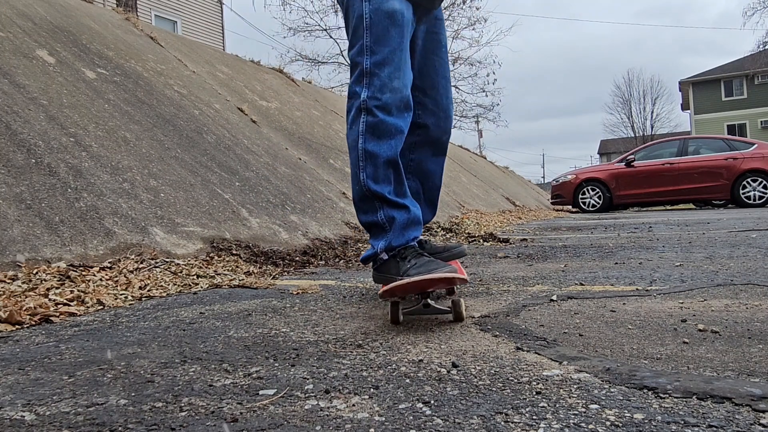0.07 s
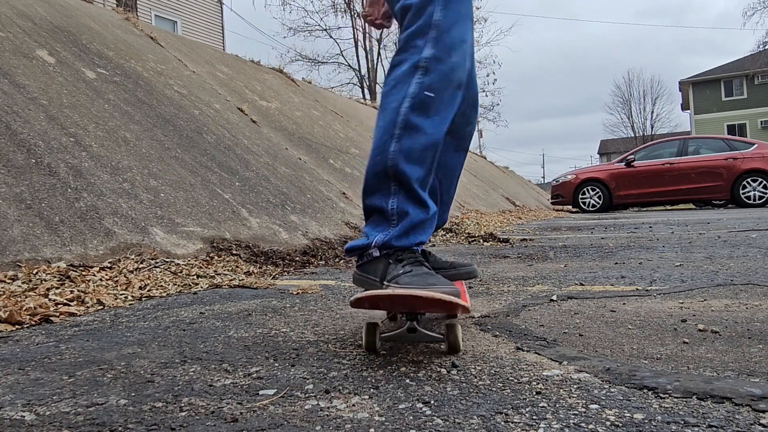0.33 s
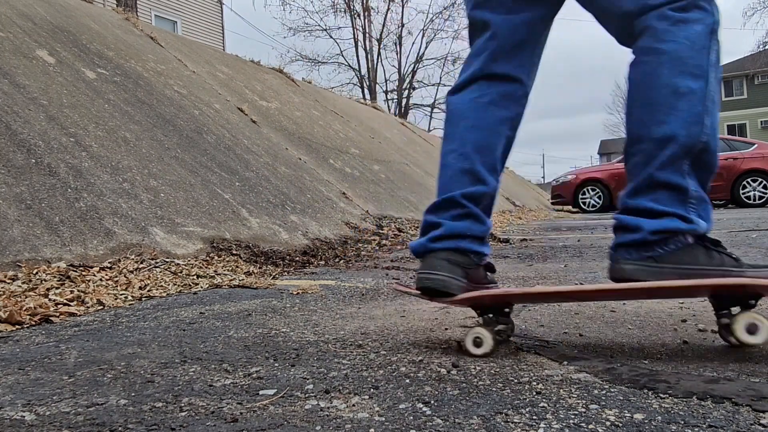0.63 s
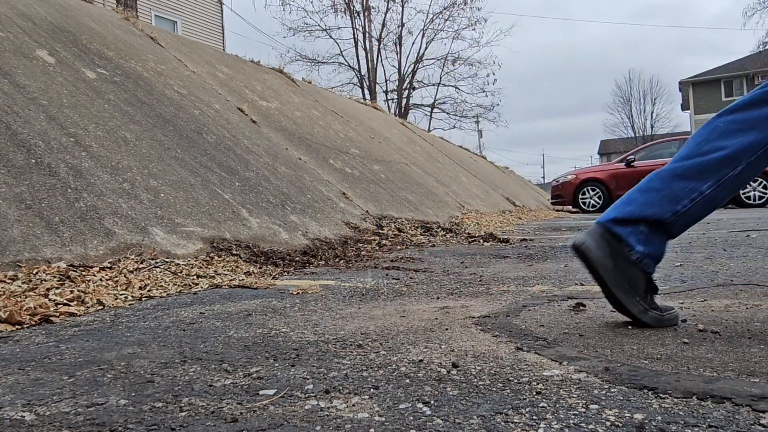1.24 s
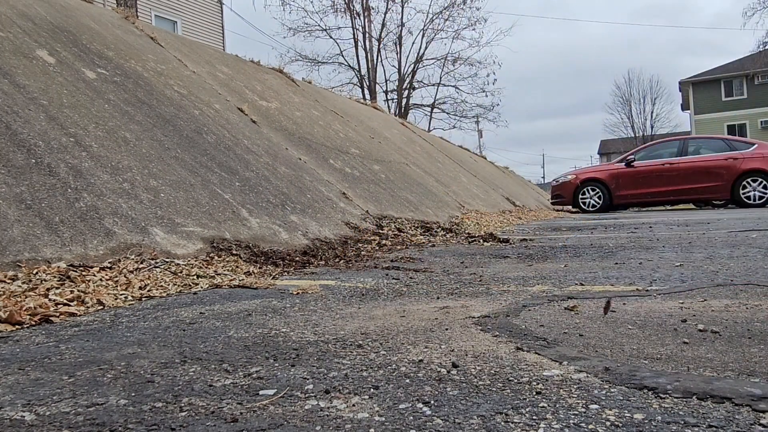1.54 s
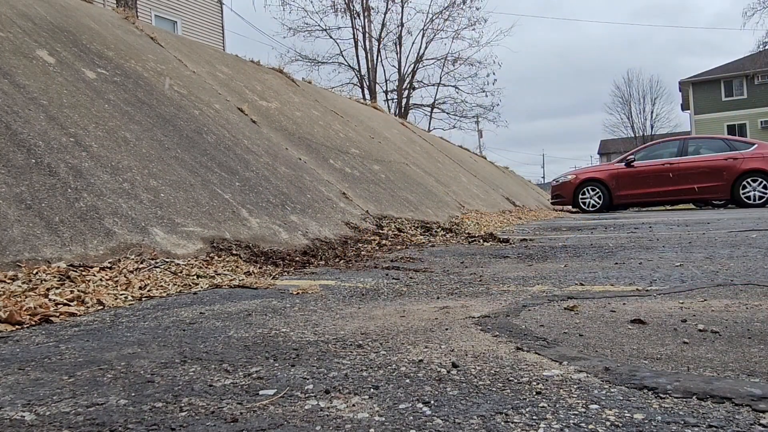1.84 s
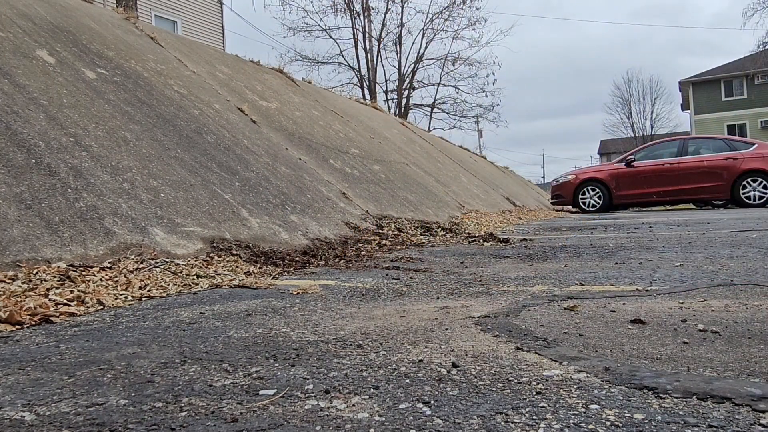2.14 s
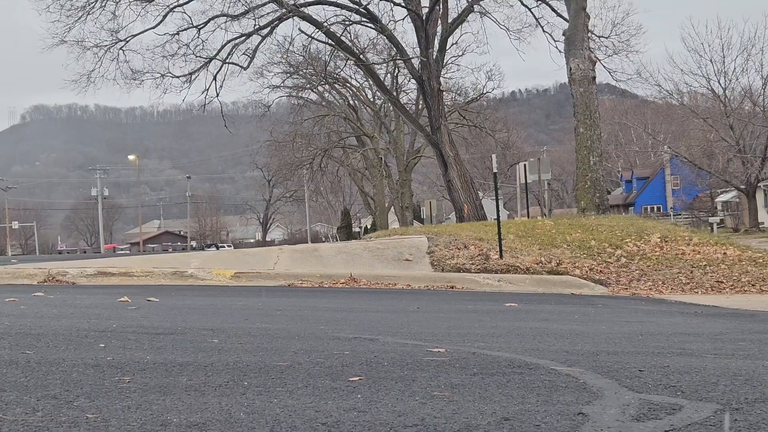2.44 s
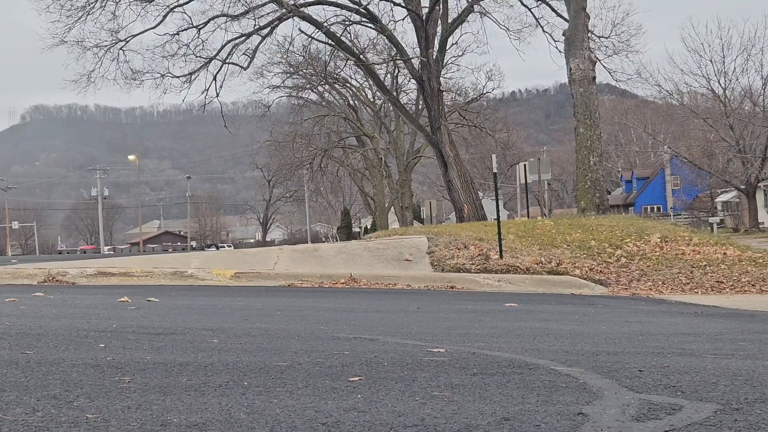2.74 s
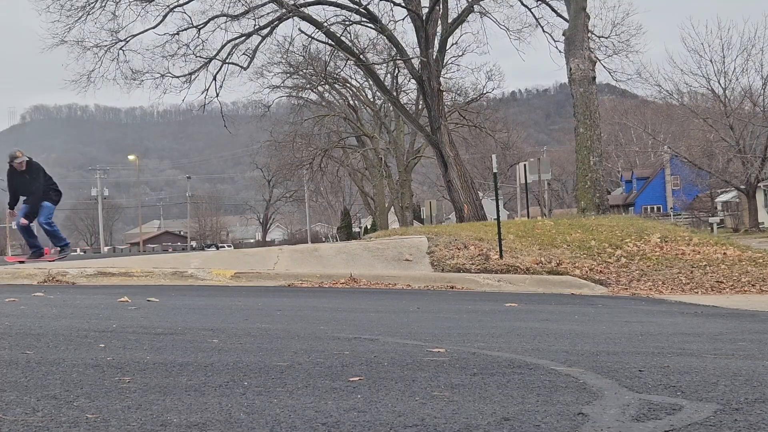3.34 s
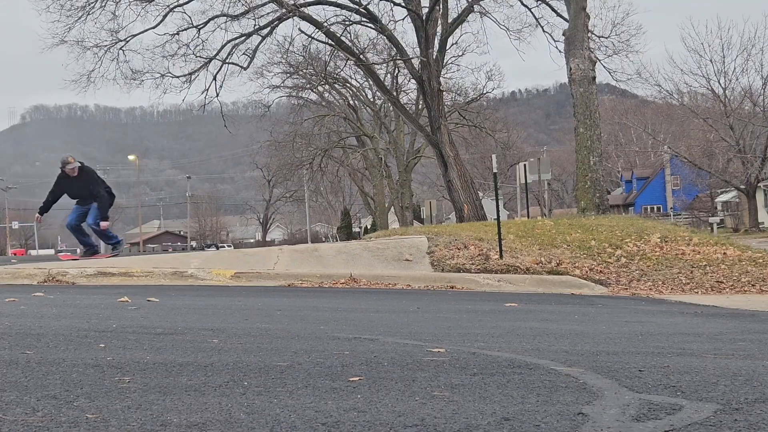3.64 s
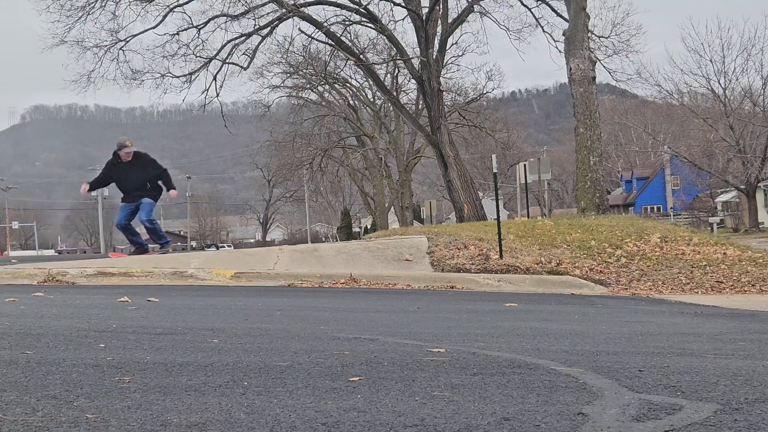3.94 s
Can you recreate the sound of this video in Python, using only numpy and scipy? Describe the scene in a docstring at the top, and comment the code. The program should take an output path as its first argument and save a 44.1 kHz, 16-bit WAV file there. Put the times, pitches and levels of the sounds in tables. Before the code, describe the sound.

A skateboard rattles past close on rough asphalt, then rumbles faintly in the distance.

```python
"""On rough asphalt, a skateboard rolls past close by: stones shake the deck, rattle the wheels and crunch.
It pivots and slaps its front wheels down, the trucks (the steel axles) scrape, the tail clacks and a
shoe scuffs. Free of the rider's weight, it rolls off to the right with a hollow drone.
After an abrupt break, a board rolls far away on a smoother street, a low rumble with a faint hiss.
Rolling and scraping are noise shaped by the board; knocks are sets of fading tones."""
import sys
import numpy as np
from scipy import signal
from scipy.fft import rfft, irfft, next_fast_len
from scipy.io import wavfile
from scipy.ndimage import map_coordinates

SR = 44100
rng = np.random.default_rng(int(sys.argv[2]) if len(sys.argv) > 2 else 0)


def log_audio(samples):
    """Write samples as a 16-bit WAV file to the path given in sys.argv[1]."""
    # one column per channel
    frames = np.atleast_2d(samples).T
    # limit to full scale, then quantise
    limited = np.clip(frames, -1, 1)
    pcm = np.round(limited * 32767).astype(np.int16)
    wavfile.write(sys.argv[1], SR, pcm)


N = 176400
T = np.arange(N) / SR
FFT_SIZE = next_fast_len(N + SR // 2)
HZ = np.fft.rfftfreq(FFT_SIZE, 1 / SR)

# How loud the close rolling is. Each row: time in seconds, then thrum, chatter and grit in dB.
ROLL_LEVELS = [(0.01, -34, -40, -45), (0.2, -37, -40.5, -51.5), (0.26, -22.5, -36, -49),
               (0.36, -18.5, -34, -40.5), (0.45, -27.5, -27, -38), (0.49, -30.5, -36.5, -43.5),
               (0.555, -23.5, -27.5, -37), (0.59, -30, -34, -42), (0.64, -30, -26, -32.5),
               (0.695, -34, -41, -47), (0.738, -29, -28, -34.5), (0.79, -44, -50.5, -57),
               (0.865, -36.5, -36.5, -41.5), (0.955, -32, -41.5, -45.5), (1.01, -77, -39.5, -44.5),
               (1.11, -49, -40.5, -44.5), (1.2, -42, -36, -48), (1.275, -26.5, -30.5, -35.5),
               (1.34, -37, -36, -44.5), (1.44, -39, -32.5, -42.5), (1.6, -34.5, -31.5, -43),
               (1.71, -33, -26, -43), (1.82, -32.5, -26, -43.5), (1.9, -26, -21, -41.5),
               (2.0, -20.5, -21.5, -43.5), (2.07, -27, -26, -44), (2.2, -30, -25, -48)]
# The rider's weight comes off the deck. Each row: time in seconds, share taken off from 0 to 1.
WEIGHT_OFF = [(1.05, 0), (1.4, .5), (1.62, 1)]
# The board's path. Each row: time in seconds, delay of the left side in ms, left over right in dB.
BOARD_PATH = [(0, 0.031, 2.5), (.4, -0.062, 3.5), (.62, 0.13, 1.3), (.9, 0.23, 2), (1.4, 0.373, -1.1),
              (1.9, 0.45, 0.2)]

# The tone colour of each noise. Each row: frequency in Hz, relative strength in dB.
THRUM_TONE = [(20, -24), (40, -17), (60, -5.5), (100, -2), (145, 1), (200, -8.5), (260, -9.5), (450, -37.5),
              (900, -102)]
CHATTER_TONE = [(100, -52), (200, -5.5), (300, 2), (410, 0), (720, -2.5), (1000, -0.5), (1600, -2),
                (2000, -10.5), (2600, -23), (4000, -19.5), (9000, -65.5)]
DRONE_TONE = [(90, -20), (140, 1.5), (200, 0), (350, 0), (510, 3), (680, -4), (1100, -20.5), (1450, -11.5),
              (1900, -22), (2500, -32.5), (3300, -35), (8000, -74.5)]
GRIT_TONE = [(800, -41), (2000, -0.5), (4000, -2.5), (8400, 0), (9700, -10.5), (11200, -11), (13000, -3),
             (15200, -2), (16000, -20)]
GRIT_AWAY_TONE = [(1500, -12.5), (2600, 5), (3400, -2.5), (4500, 3.5), (5700, -3), (7300, 1.5),
                  (8800, -6.5), (11000, -12.5), (15000, -5.5)]
AIR_TONE = [(20, -12.5), (50, 5.5), (300, -17.5), (1000, -57.5)]
SCRAPE_TONE = [(1500, -23.5), (3000, 0), (6000, -3.5), (10000, -26)]
FAR_RUMBLE_TONE = [(25, -20.5), (50, -1), (105, 0.5), (180, -5.5), (245, -5), (320, -12), (470, -7.5),
                   (600, -12.5), (800, -19.5), (960, -32.5), (1300, -35), (8000, -77)]
FAR_HISS_TONE = [(500, -16.5), (1200, 5), (2200, -2.5), (3500, -1), (6000, -4.5), (8500, -6.5),
                 (10500, -33), (13500, -16.5), (16000, -31)]
FAR_CLACK_TONE = [(150, -26), (520, 10), (1250, -9.5), (2200, -28), (9000, -63)]
# How alike left and right sound. Each row: frequency in Hz, likeness (1 means the same).
NEAR_LIKENESS = [(60, 0.67), (400, 0.92), (1500, 0.73), (4500, 0.13), (12000, 0.27)]
FAR_LIKENESS = [(100, 1), (400, 0.96), (1500, 0.28), (5000, 0.45), (12000, .35)]
# Where the deck (with and without weight) and the steel trucks ring.
# Each row: frequency in Hz, width in Hz, height over the noise in dB.
LOADED_PEAKS = [(521, 18, 2), (714, 45, 3.5), (1316, 39, -12.5)]
UNLOADED_PEAKS = [(217, 26, -0.5), (345, 40, 2.5), (2076, 87, 7.5)]
TRUCK_PEAKS = [(3540, 160, 19), (4280, 140, 6), (5400, 260, 14.5)]
# The tones of the struck board and tail. Each row: pitch in Hz, level in dB, seconds to fade by 60 dB.
BOARD_MODES = [(162.6, -14, 0.11), (308, -11, 0.054), (552, -0.5, 0.026), (635, -9.5, 0.033),
               (920, -9, 0.023), (1334, -12.5, 0.027), (1583, -6.5, 0.038), (1692, -10.5, 0.024),
               (2192, -17, 0.056), (3630, -19.5, 0.025), (5160, -19.5, 0.025)]
TAIL_MODES = [(283.6, -1.5, 0.081), (706, -1, 0.077), (1117, -1, 0.043), (1440, -8, 0.091), (1950, -9, .06)]

# Wheels hit stones or land. Each row: start in seconds, level in dB, offset for its crack in dB.
WHEEL_KNOCKS = [(0.031, -38.5, 9), (.107, -33, -3), (0.176, -22.5, -11), (.252, -23, -6.5),
                (.299, -21.5, -14), (.388, -16.5, -12), (0.4418, -20.5, -22.5), (0.5432, -22.5, -9),
                (.622, -20.5, -9.5), (0.7134, -13.5, -6.5), (0.7430, -4.5, -12.5), (.984, -26.5, -7.5),
                (1.034, -23, 0), (1.131, -30, -7), (1.776, -18, -30), (1.933, -11.5, -4),
                (1.981, -20.5, -19), (2.2015, -21, -17)]
# Pebbles snap under the wheels. Each row: start in seconds, level in dB, pitch in Hz.
PEBBLE_SNAPS = [(0.059, -28.5, 4530), (.185, -32, 6240), (0.336, -28, 4220), (0.44, -27, 5450),
                (0.5435, -28.5, 2136), (.69, -28.5, 7600), (.848, -25, 5380), (0.9853, -23.5, 6370),
                (1.128, -28.5, 7740), (1.367, -20, 8260), (1.373, -23, 7700), (1.477, -25, 8200),
                (1.491, -23, 3370), (1.7754, -29.5, 2150), (1.874, -31, 4560), (1.922, -25, 4470),
                (1.934, -22.5, 2090), (2.0726, -26.5, 4530)]
# The trucks scrape as the board swings round. Each row: time in seconds, level in dB.
SCRAPE_LEVELS = [(.785, -88), (.805, -45.5), (.87, -46.5), (.915, -39.5), (1.0, -68.5)]
# The tail skips on the asphalt. Each row: start in seconds, level in dB.
TAIL_HITS = [(.896, -31), (.903, -22.5), (.910, -23.5), (.919, -21)]
# Tail and shoe scuff the ground. Each row: middle and half length in seconds, deck and grit in dB.
SCUFF_SWELLS = [(0.911, 0.014, -31, -27.5), (1.164, 0.011, -30.5, -32.5), (1.305, 0.0084, -35, -35.5),
                (1.385, 0.017, -34.5, -37), (1.5, 0.0036, -30.5, -31)]
# The riderless board hums. Each row: middle and half length in seconds, pitch in Hz, level in dB.
HUM_SWELLS = [(1.409, 0.063, 483, -33.5), (1.71, .028, 480, -26.5), (1.755, 0.056, 135, -28.5),
              (1.98, 0.017, 140, -23), (2.07, 0.076, 334, -26.5), (2.155, 0.042, 206.1, -27)]
# How loud the distant rumble and hiss are. Each row: time in seconds, level in dB.
FAR_RUMBLE_LEVELS = [(2.6, -31), (2.78, -28), (3.0, -29.5), (3.28, -31.5), (3.44, -27.5), (3.58, -30.5),
                     (3.71, -28), (4, -28.5)]
FAR_HISS_LEVELS = [(2.42, -55), (2.58, -58.5), (2.72, -51.5), (2.89, -59), (3.3, -54), (3.42, -66.5),
                   (4, -66.5)]
# Distant wheels tick over seams and clack on the pavement. Each row: start in seconds, level in dB.
FAR_SEAM_TICKS = [(2.517, -48), (2.718, -41.5), (2.999, -49.5)]
FAR_WHEEL_CLACKS = [(3.404, -37.5), (3.519, -36), (3.745, -30.5), (3.907, -45)]


def amp(db):
    """Turn decibels into a gain."""
    return 10 ** (np.asarray(db) / 20)


def unit(x):
    """Scale to an average power of 1."""
    return x / np.sqrt(np.mean(x ** 2) + 1e-20)


def along(points):
    """Join (Hz, value) points into a curve over all frequencies."""
    hz, values = np.transpose(points)
    return np.interp(np.log(HZ + 1), np.log(hz + 1), values)


def curves(rows):
    """Give one value per sample for each column after the time."""
    times, *columns = np.transpose(rows)
    return [np.interp(T, times, column) for column in columns]


def wobble(rate):
    """A smooth curve through rate random values a second."""
    return map_coordinates(rng.standard_normal(4096), [T * rate], mode="wrap")


def decay(start, t60):
    """Start suddenly, then fade by 60 dB every t60 seconds."""
    return (T >= start) * np.exp(-np.log(1000) * np.abs(T - start) / t60)


def swell(middle, half):
    """Rise and fall in a bell shape."""
    return np.exp(-.5 * ((T - middle) / half) ** 2)


def body(tone, peaks=()):
    """A filter for how an object colours sound: its broad tone plus ringing peaks."""
    ringing = sum(amp(db) / (1 + (2 * (HZ - hz) / width) ** 2) for hz, width, db in peaks)
    gain = unit(amp(along(tone)) * (1 + ringing))
    cepstrum = irfft(np.log(np.maximum(gain, 1e-6)), FFT_SIZE)
    # Folding it in half makes the object ring after a push, never before.
    cepstrum[1:FFT_SIZE // 2] *= 2
    cepstrum[FFT_SIZE // 2 + 1:] = 0
    return np.exp(rfft(cepstrum))


def stones(rate, spread_db, life_s, bed):
    """The push of rough ground: rate random bumps a second over a steady share, the bed."""
    hits = (rng.random(N) < rate / SR) * amp(spread_db * np.minimum(rng.exponential(size=N), np.pi))
    power = signal.lfilter([1], [1, -np.exp(-1 / (life_s * SR))], hits ** 2)
    return np.sqrt(bed + (1 - bed) * power / power.mean())


def rub(force, response, likeness=NEAR_LIKENESS):
    """Rough contact: stereo noise follows the force and sounds through a body."""
    angle = np.arccos(along(likeness)) / 2
    noise = rfft(force * rng.standard_normal((2, N)), FFT_SIZE)
    mid, side = irfft(noise * response * [np.cos(angle), np.sin(angle)], FFT_SIZE)[:, :N]
    return np.array([mid + side, mid - side])


def struck(modes, blows):
    """Each blow rings an object's own tones, a little differently every time."""
    out, t = np.zeros(N + SR), np.arange(SR // 3) / SR
    attack = 1 - np.exp(-t / .001)
    for start, db in blows:
        ring = 0
        for hz, level, t60 in modes:
            gain = amp(level + 1.5 * rng.standard_normal())
            pitch = hz * (1 + .014 * rng.standard_normal())
            ring += gain * np.exp(-np.log(1000) * t / t60) * np.sin(2 * np.pi * pitch * t)
        out[round(start * SR):][:len(t)] += amp(db) * ring * attack
    return out[:N]


def panned(x, db):
    """Make the left side louder than the right by db."""
    return x * np.array([amp(db / 2), amp(-db / 2)]).reshape(2, -1)


def lagged(x, ms):
    """Make the left side later than the right by ms."""
    half = ms * SR / 2000
    return np.array([map_coordinates(channel, [np.arange(N) + shift], order=5)
                     for channel, shift in zip(x, (-half, half))])


def bounced(x, delay_ms, share):
    """Add the echo off the ground, whose delay changes as the board moves."""
    late = np.arange(N) - delay_ms * SR / 1000
    echo = np.array([map_coordinates(channel, [late], order=3) for channel in x])
    return unit(x + share * echo)


def rolling():
    """Stones shake the deck, rattle the wheels and crunch; without weight the deck turns hollow."""
    thrum_db, chatter_db, grit_db = curves(ROLL_LEVELS)
    free, = curves(WEIGHT_OFF)
    bumps = stones(rate=300, spread_db=4, life_s=.0018, bed=.22)
    thrum = amp(thrum_db - 5) * rub(bumps, body(THRUM_TONE))
    chatter = amp(chatter_db + 1) * rub(bumps, body(CHATTER_TONE, LOADED_PEAKS))

    # Without weight, the deck booms below 770 Hz and the trucks rattle above it.
    shake = stones(rate=280, spread_db=1.5, life_s=.0047, bed=.18)
    hollow = body(DRONE_TONE, UNLOADED_PEAKS)
    low_share = 1 / (1 + (HZ / 770) ** 10)
    boom = amp(thrum_db + .5) * rub(shake, hollow * np.sqrt(low_share))
    rattle = amp(chatter_db + 2.5) * rub(shake, hollow * np.sqrt(1 - low_share))

    # Most of the close grit comes with the same bumps that shake the deck.
    crunch = stones(rate=400, spread_db=3, life_s=.00042, bed=.19)
    close = rub(np.sqrt(.92 * bumps ** 2 + .08 * crunch ** 2), body(GRIT_TONE))
    close = bounced(close, delay_ms=.68 + .071 * wobble(2.5), share=.17)
    away = rub(stones(rate=1400, spread_db=5, life_s=.0006, bed=.16), body(GRIT_AWAY_TONE))
    grit = amp(grit_db + 2) * (np.sqrt(1 - free ** 3) * close + np.sqrt(free ** 3) * away)
    return thrum + np.sqrt(1 - free) * chatter + np.sqrt(free) * (boom + rattle) + grit


def outdoor_air():
    """The open air makes a low, steady noise."""
    return amp(-40) * rub(1, body(AIR_TONE))


def wheel_knocks():
    """Each blow rings the deck and cracks on the asphalt."""
    wood = struck(BOARD_MODES, [(start, db) for start, db, _ in WHEEL_KNOCKS])
    cracks = sum(amp(db + crack_db) * decay(start, t60=.032) for start, db, crack_db in WHEEL_KNOCKS)
    return panned(wood, db=-3.5) + amp(-5.5) * rub(cracks, body(GRIT_TONE))


def pebbles():
    """Each pebble gives a bright snap and a brief ring of its own pitch."""
    force = sum(amp(db) * decay(start, t60=.015) for start, db, _ in PEBBLE_SNAPS)
    rings = sum(amp(db) * decay(start, t60=.029) * np.sin(2 * np.pi * hz * (T - start))
                for start, db, hz in PEBBLE_SNAPS)
    return rub(force, body(GRIT_TONE)) + amp(-5.5) * rings


def truck_scrape():
    """A rough scrape makes the steel trucks ring."""
    level_db, = curves(SCRAPE_LEVELS)
    return rub(amp(level_db), body(SCRAPE_TONE, TRUCK_PEAKS))


def tail_clack():
    """The tail skips on the asphalt with its own woody ring."""
    return struck(TAIL_MODES, TAIL_HITS)


def scuffs():
    """Tail and shoe rub the ground in short grainy swells that sound through the deck."""
    grain = stones(rate=300, spread_db=2.5, life_s=.0013, bed=.6)
    deck = sum(amp(db) * swell(middle, half) for middle, half, db, _ in SCUFF_SWELLS)
    grit = sum(amp(db) * swell(middle, half) for middle, half, _, db in SCUFF_SWELLS)
    return rub(grain * deck, body(CHATTER_TONE, LOADED_PEAKS)) + rub(grain * grit, body(GRIT_TONE))


def hums():
    """The riderless board gives rough hums that swell and sag in pitch."""
    sag_per_s, waver, flutter_db = .4, .022, 3
    out = np.zeros(N)
    for middle, half, hz, db in HUM_SWELLS:
        pitch = hz * np.exp(-sag_per_s * (T - middle) + waver * wobble(60))
        level = amp(db + flutter_db * wobble(70)) * swell(middle, half)
        out += level * np.sin(2 * np.pi * np.cumsum(pitch) / SR)
    return amp(-1) * out


def distant_board():
    """Far wheels give mostly rumble and dull clacks, with a thin hiss and ticks from the left."""
    rumble_db, = curves(FAR_RUMBLE_LEVELS)
    hiss_db, = curves(FAR_HISS_LEVELS)
    bumps = stones(rate=200, spread_db=5, life_s=.0046, bed=.62)
    rumble = amp(rumble_db + .57 * wobble(15)) * rub(bumps, body(FAR_RUMBLE_TONE), FAR_LIKENESS)
    blows = sum(amp(db) * decay(start, t60=.08) for start, db in FAR_WHEEL_CLACKS)
    clacks = rub(blows, body(FAR_CLACK_TONE), FAR_LIKENESS)
    grain = amp(hiss_db) * stones(rate=99, spread_db=2.5, life_s=.0011, bed=.49)
    ticks = sum(amp(db) * decay(start, t60=.069) for start, db in FAR_SEAM_TICKS)
    hiss = rub(np.hypot(grain, ticks), body(FAR_HISS_TONE), FAR_LIKENESS)
    return lagged(panned(rumble + clacks, db=1.74) + panned(hiss, db=6.5), ms=-.18)


def scene():
    """Play the close pass, a short break, then the distant run."""
    near_end_s, far_start_s, fade_s = 2.224, 2.314, .011
    lag_ms, pan_db = curves(BOARD_PATH)
    board = panned(rolling() + scuffs() + truck_scrape() + pebbles() + hums(), pan_db)
    near = lagged(board + wheel_knocks() + tail_clack(), lag_ms) + outdoor_air()
    fade_out = np.exp(-np.maximum(T - near_end_s, 0) / (.37 * fade_s))
    fade_in = np.clip((T - far_start_s) / fade_s + .5, amp(-49), 1)
    return near * fade_out + distant_board() * fade_in


def record(dry):
    """Remove the very highest treble, above 16300 Hz."""
    return irfft(rfft(dry, FFT_SIZE) * (HZ < 16300), FFT_SIZE)[:, :N]


dry = scene()
out = record(dry)
log_audio(out)
```